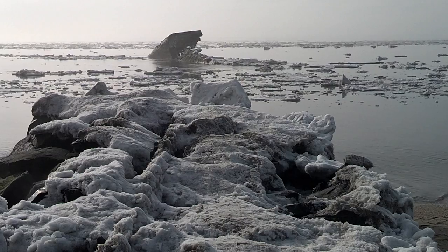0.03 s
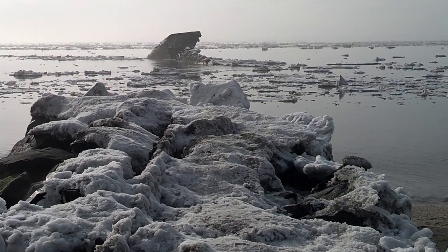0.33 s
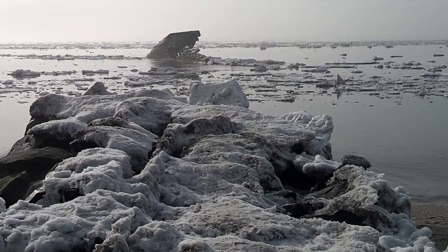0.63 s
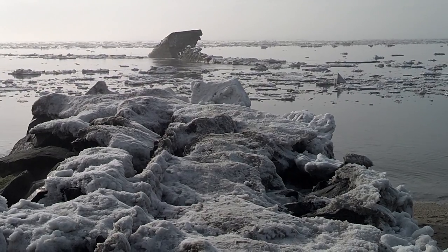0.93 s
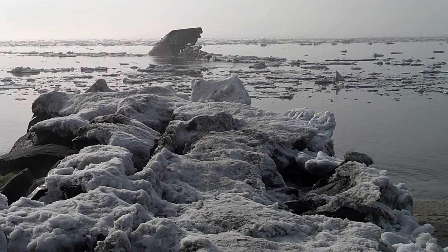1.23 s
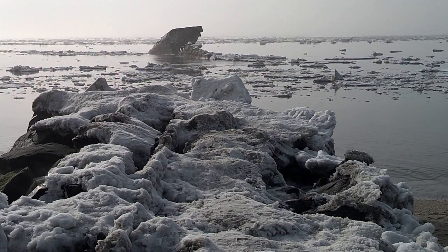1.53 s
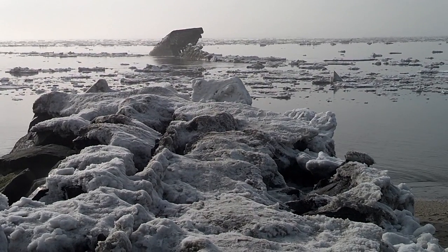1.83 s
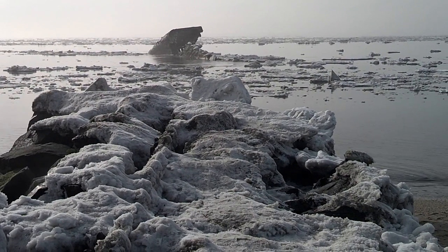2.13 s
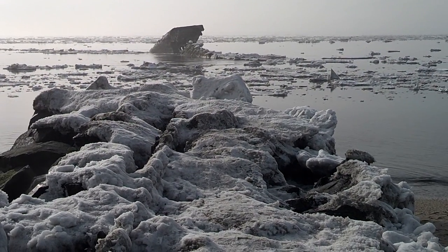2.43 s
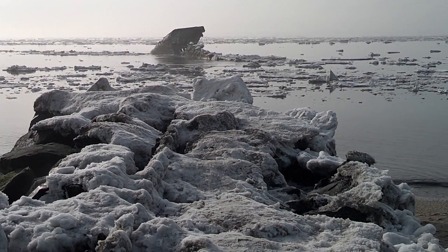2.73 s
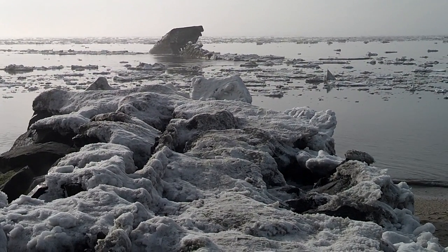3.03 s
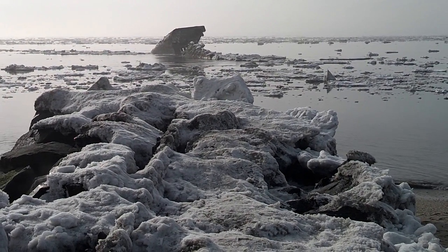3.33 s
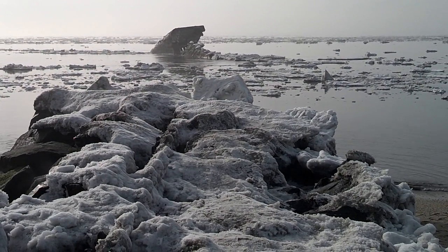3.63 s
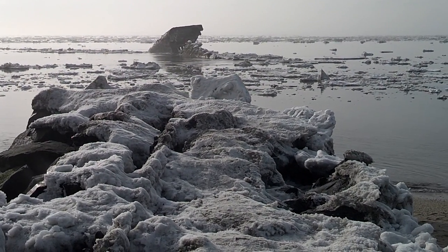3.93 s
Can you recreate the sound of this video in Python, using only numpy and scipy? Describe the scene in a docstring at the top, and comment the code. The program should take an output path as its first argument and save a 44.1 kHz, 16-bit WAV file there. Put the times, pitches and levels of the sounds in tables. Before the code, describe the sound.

Small waves wash and fizz on an icy shore while wind thumps the microphone.

```python
"""Small waves on an icy shore

One wave drains away, the water lies almost still, and the next rolls in. The wash fizzes with
small ringing bubbles; spurts of spray, hollow plops and two faint whistles stand out.
Wind rumbles and thumps on the ports of a small camera, which widens its stereo by delayed cross-feed."""
import sys
import numpy as np
from scipy import signal
from scipy.fft import rfft, irfft, next_fast_len
from scipy.io import wavfile
from scipy.ndimage import uniform_filter1d, map_coordinates

SR = 44100
rng = np.random.default_rng(int(sys.argv[2]) if len(sys.argv) > 2 else 0)


def store_pcm(level_fs):
    """Save levels as 16-bit WAV."""
    pcm = np.round(np.clip(level_fs, -1, 1) * 32767).astype(np.int16)
    wavfile.write(sys.argv[1], SR, np.atleast_2d(pcm).T)


N = 176400


def amp(db):
    """Decibels to gain."""
    return 10 ** (np.asarray(db) / 20)


def unit(x):
    """Scale to rms 1."""
    return x / np.sqrt(np.mean(x ** 2) + 1e-20)


def along(points, hz):
    """Interpolate (freq_hz, value) points on a log axis."""
    freqs_hz, values = np.transpose(points)
    return np.interp(np.log(hz + 1), np.log(freqs_hz + 1), values)


def curves(rows):
    """Per-sample curve for each column after time_s."""
    time_s, *columns = np.transpose(rows)
    return [np.interp(np.arange(N) / SR, time_s, column) for column in columns]


def wobble(knots_per_s):
    """Smooth random curve."""
    knots = rng.standard_normal(int(N * knots_per_s / SR) + 4)
    return map_coordinates(knots, [np.arange(N) * knots_per_s / SR])


def filtered(x, response):
    """Apply a complex frequency response."""
    size = next_fast_len(N + SR // 2)
    return irfft(rfft(x, size) * response(np.fft.rfftfreq(size, 1 / SR)), size)[..., :N]


def coloured(x, spectrum):
    """Apply a (freq_hz, gain_db) curve."""
    return filtered(x, lambda hz: amp(along(spectrum, hz)))


def noise(spectrum):
    """Coloured noise, rms 1, unrelated at the two ports."""
    return unit(coloured(rng.standard_normal((2, N)), spectrum))


def swell(start_s, level_db, rise_s, t60_s):
    """Envelope: linear rise, hold for 0.6 rise times, exponential decay."""
    age_s = np.arange(N) / SR - start_s
    decay_s = np.maximum(age_s - 1.6 * rise_s, 0)
    return amp(level_db - 60 * decay_s / t60_s) * np.clip(age_s / rise_s, 0, 1)


# Difference between the ports: freq_hz, side_over_mid_db
WATER_WIDTH = [(130, -8), (300, -11), (600, -2), (900, -3.5), (1400, 15), (2000, -3.5), (3300, -1.5),
               (12000, 1.5)]
LEFT_LEAN = 0.66  # mid-side correlation


def water_noise(spectrum, patchy_db):
    """Rush of water lying to the left, rms 1, patchy in time and frequency."""
    cells = signal.stft(rng.standard_normal((2, N)), nperseg=512)[2]
    patches = uniform_filter1d(rng.standard_normal(cells.shape[1:]), size=6, axis=0)
    patches = uniform_filter1d(patches, size=8, axis=1)
    mid, diffuse = signal.istft(cells * amp(patchy_db * unit(patches)), nperseg=512)[1][:, :N]
    side = coloured(LEFT_LEAN * mid + np.sqrt(1 - LEFT_LEAN ** 2) * diffuse, WATER_WIDTH)
    return unit(coloured(np.array([mid + side, mid - side]), spectrum))


BUBBLES_PER_S, BUBBLE_HZ, BUBBLE_LOG_SPREAD, BUBBLE_CYCLES, BUBBLE_SCATTER_DB = 800, 2154, 0.527, 7.6, 5.5


def bubbles():
    """Tiny bubbles, each a short ring rising in pitch; rms 1."""
    count = int(BUBBLES_PER_S * N / SR)
    when, right_gain, strength, u, v = rng.random((count, 5)).T
    gaussian = np.sqrt(-2 * np.log(1 - u)) * np.cos(2 * np.pi * v)
    pitch_hz = np.clip(BUBBLE_HZ * np.exp(BUBBLE_LOG_SPREAD * gaussian), 400, 12000)
    offsets = np.arange(SR // 40)
    age = pitch_hz[:, None] * offsets / SR / BUBBLE_CYCLES
    chirp = 1 + 0.15 * np.minimum(age, 2)
    rings = np.sin(2 * np.pi * BUBBLE_CYCLES * age * chirp) * np.exp(-2 * age)
    rings *= amp(BUBBLE_SCATTER_DB * np.minimum(-np.log(1 - strength), 5))[:, None]
    at = ((when * N).astype(int)[:, None] + offsets).ravel()
    ports = (rings, rings * right_gain[:, None])
    return unit(np.array([np.bincount(at, port.ravel(), N)[:N] for port in ports]))


# Ebb and return, before trims: time_s, wash_db, froth_db, foam_db
WAVE_LEVELS = [(0.0, -42, -42, -46), (0.21, -43, -44, -46.5), (0.47, -44, -47.5, -48),
               (0.91, -43.5, -45, -47), (1.08, -44, -46, -49.5), (1.35, -48, -52, -54),
               (1.71, -48, -59, -53), (1.85, -49, -60.5, -53), (1.98, -51, -60, -59),
               (2.09, -55, -63, -61.5), (2.51, -54, -61.5, -59.5), (2.65, -55.5, -64.5, -61.5),
               (2.88, -55, -62.5, -64.5), (3.11, -54.5, -64.5, -53.5), (3.21, -48.5, -57, -55.5),
               (3.35, -47, -52, -49), (3.48, -44.5, -52.5, -49), (3.84, -44, -46.5, -47.5),
               (4.0, -44, -44.5, -49.5)]
# Surf spectra: freq_hz, density_db
WASH_SPECTRUM = [(40, -24), (120, 2), (200, -1), (300, 3.5), (420, 0), (520, -3.5), (650, -2.5), (850, -5),
                 (1100, -8.5), (1400, -11.5), (2000, -14.5), (4500, -55)]
FROTH_SPECTRUM = [(700, -35), (1300, -45), (1650, -5), (2050, 3.5), (2500, 2.5), (3000, 5.5), (4000, -28),
                  (8000, -57)]
FOAM_SPECTRUM = [(1200, -33), (2400, 3.5), (3200, 1.5), (4300, 0.5), (5600, 0.5), (7200, -1.5), (9500, -6),
                 (12500, -15.5), (15500, -16)]
WASH_TRIM_DB, FROTH_TRIM_DB, FOAM_TRIM_DB, BUBBLE_TRIM_DB = 3, 1.5, 1.5, -15


def surf():
    """Water washes, froth seethes, foam hisses; the bubbles swell with the froth."""
    wash_db, froth_db, foam_db = curves(WAVE_LEVELS)
    wash = amp(wash_db + WASH_TRIM_DB + 0.47 * wobble(14)) * water_noise(WASH_SPECTRUM, 1.55)
    froth = amp(froth_db + FROTH_TRIM_DB + 0.84 * wobble(25.53)) * water_noise(FROTH_SPECTRUM, 3.0)
    foam = amp(foam_db + FOAM_TRIM_DB + 0.79 * wobble(25.2)) * water_noise(FOAM_SPECTRUM, 1.33)
    return wash + froth + foam + amp(froth_db + BUBBLE_TRIM_DB) * bubbles()


# Turbulence at the ports: time_s, level_db
BREEZE_LEVELS = [(0, -43), (.75, -42.5), (1.22, -46.5), (1.35, -52), (1.45, -40.5), (1.65, -52.5),
                 (2.0, -43.5), (2.25, -42.5), (2.65, -38), (2.72, -49), (2.95, -53), (3.2, -48.5),
                 (3.4, -45), (3.8, -45.5), (4, -47)]
# Its rumble: freq_hz, density_db
BREEZE_SPECTRUM = [(20, -35), (40, -14.5), (70, -9.5), (110, -1.5), (170, -12), (300, -21.5), (700, -39),
                   (3000, -70)]
FLUTTER_DB, FLUTTER_PER_S, WIND_LEFT_DB = 3.8, 24, -6


def breeze():
    """Continuous turbulence: a fluttering rumble, weaker on the left."""
    level_db, = curves(BREEZE_LEVELS)
    rumble = unit(amp(FLUTTER_DB * wobble(FLUTTER_PER_S)) * noise(BREEZE_SPECTRUM))
    return amp(level_db) * rumble * amp([[WIND_LEFT_DB], [0]])


# Eddies striking the ports, before trim: time_s, peak_db, sharpness_hz
EDDY_HITS = [(0.0595, -15, 350), (0.229, -16, 287), (0.262, -29.5, 97), (0.301, -30, 54), (0.331, -29, 43),
             (0.484, -32, 30), (0.656, -29.5, 43), (0.73, -28, 68), (0.752, -24.5, 96), (0.8153, -29, 30),
             (0.9734, -36.5, 77), (1.0736, -33, 138), (1.0981, -30.5, 109), (1.249, -26.5, 108),
             (1.476, -32, 97), (1.502, -31, 43), (1.6152, -30, 43), (1.6509, -32.5, 43), (1.678, -32, 61),
             (1.7285, -32, 38), (1.8382, -22.5, 51.7), (1.9456, -34.5, 47.7), (2.0785, -26.5, 63),
             (2.16, -29.5, 54), (2.196, -33, 48), (2.221, -33, 75.6), (2.3226, -31, 70.5),
             (2.375, -35, 155), (2.4286, -28, 144), (2.471, -27.5, 66.6), (2.543, -30, 60.4),
             (2.5898, -32.5, 54), (2.6121, -29, 68), (2.6436, -24.5, 134), (2.7358, -34.5, 43),
             (2.7831, -28.5, 250), (2.845, -32.5, 38), (3.0336, -28.5, 270), (3.397, -36, 86),
             (3.6977, -24, 74.6), (3.842, -23, 450), (3.8478, -21.5, 61), (3.8776, -21, 155),
             (3.898, -30, 174), (3.931, -25, 220), (3.9574, -14, 480)]
EDDY_TRIM_DB, EDDY_LEFT_GAIN, PORT_CUT_HZ = 3, 0.038, 109
CRACK_GAIN, CRACK_ROLLOFF_HZ, FULL_CRACK_SHARPNESS_HZ = 0.17, 1150, 450


def eddies():
    """Each eddy is one rounded pressure push through the ports' bass cut; the sharpest crack."""
    size, lead = 4096, 1024
    hz = np.fft.rfftfreq(size, 1 / SR)
    bass_cut = signal.freqs(*signal.butter(4, PORT_CUT_HZ, "high", analog=True), hz)[1]
    pushes = np.zeros(N + SR)
    for time_s, peak_db, sharpness_hz in EDDY_HITS:
        violence = min(sharpness_hz / FULL_CRACK_SHARPNESS_HZ, 1) ** 3
        crack = CRACK_GAIN * violence * np.exp(-hz / CRACK_ROLLOFF_HZ)
        thump = np.exp(-hz / sharpness_hz)
        push = np.roll(irfft(bass_cut * (thump + crack), size), lead)
        pushes[int(time_s * SR):][:size] -= amp(peak_db + EDDY_TRIM_DB) * push / np.abs(push).max()
    right = pushes[lead:lead + N]
    return np.array([EDDY_LEFT_GAIN * right, right])


# Spurts of spray: start_s, level_db, rise_s, t60_s, treble_db
SPRAY_SPURTS = [(.245, -46, 0.011, 0.26, -4), (.6185, -28.7, 0.005, 0.115, -0.5),
                (.791, -44.5, 0.0066, .08, -2), (1.245, -41.5, 0.019, 0.19, 4),
                (1.76, -52.5, 0.023, 0.19, -1), (2.2595, -40.5, 0.00099, 0.0076, 1),
                (2.355, -55.5, 0.016, 0.1, -5), (2.84, -59.5, .015, 0.14, -5),
                (2.99, -57.5, 0.0043, 0.055, -4), (3.696, -42.5, 0.0012, 0.021, -4)]
# Droplet hiss: freq_hz, density_db
SPRAY_SPECTRUM = [(500, -14), (1400, 5.5), (3200, 8), (5000, 5), (7200, 9), (10000, -2.5), (15500, -10)]
SPATTER_DB, SPATTER_PER_S = 2.2, 450


def spray():
    """Short spurts of spattering droplets, each with its own brightness."""
    out = np.zeros((2, N))
    hiss = water_noise(SPRAY_SPECTRUM, patchy_db=0.5) * unit(amp(SPATTER_DB * wobble(SPATTER_PER_S)))
    treble = filtered(hiss, lambda hz: along([(7000, 0), (12000, 1)], hz))
    for *envelope, treble_db in SPRAY_SPURTS:
        out += swell(*envelope) * (hiss + (amp(treble_db) - 1) * treble)
    return out


# Plops among the ice, before port gains: start_s, pitch_hz, level_db, t60_s
ICE_PLOPS = [(1.25, 166, -34, 0.083), (2.355, 204, -30.5, 0.08), (2.632, 280, -31, 0.092),
             (3.113, 850, -47, 0.055), (3.231, 317, -21.5, 0.016), (3.584, 352, -32.5, 0.052)]
PLOP_RISE_PER_S, PLOP_ATTACK_S = 3.4, 0.001


def plops():
    """Large trapped bubbles ring briefly and rise in pitch."""
    out = np.zeros(N)
    for start_s, pitch_hz, level_db, t60_s in ICE_PLOPS:
        age_s = np.clip(np.arange(N) / SR - start_s, 0, 0.5)
        envelope = amp(level_db - 60 * age_s / t60_s) * (1 - np.exp(-age_s / PLOP_ATTACK_S))
        cycles = pitch_hz * age_s * (1 + PLOP_RISE_PER_S * age_s / 2)
        out += envelope * np.sin(2 * np.pi * cycles)
    return np.array([1.75 * out, 0.9 * out])


# Whistles of the water: start_s, length_s, start_hz, end_hz, level_db
WHISTLE_GLIDES = [(2.34, .11, 590, 920, -50.5), (3.215, .21, 910, 730, -49.5)]
GURGLE_DEPTH, GURGLE_PER_S = 0.55, 180


def whistles():
    """Faint gurgling resonances on the left glide fast, then settle."""
    out = np.zeros(N)
    for start_s, length_s, start_hz, end_hz, level_db in WHISTLE_GLIDES:
        progress = np.clip((np.arange(N) / SR - start_s) / length_s, 0, 1)
        pitch_hz = end_hz + (start_hz - end_hz) * (1 - progress) ** 1.5
        tone = np.exp(2j * np.pi * np.cumsum(pitch_hz) / SR)
        gurgle = 1 + GURGLE_DEPTH * (wobble(GURGLE_PER_S) + 1j * wobble(GURGLE_PER_S))
        envelope = amp(level_db) * np.minimum(2 * np.sin(np.pi * progress), 1)
        out += envelope * (gurgle * tone).real
    return np.array([out, 0.18 * out])


# Gusts: start_s, level_db, rise_s, t60_s
GUST_SWELLS = [(3.84, -32, 0.033, 0.35), (3.923, -33, 0.017, 0.11)]
# Their tearing noise: freq_hz, density_db
GUST_SPECTRUM = [(40, -25), (130, 1.5), (400, -5), (900, -11), (2000, -11.5), (5000, -23.5), (14000, -43)]


def gusts():
    """Brief gusts tear at the ports, weaker on the left."""
    envelope = sum(swell(*gust) for gust in GUST_SWELLS)
    return envelope * noise(GUST_SPECTRUM) * amp([[WIND_LEFT_DB], [0]])


def scene():
    """Water and wind at the left and right ports."""
    water = surf() + spray() + plops() + whistles()
    wind = breeze() + eddies() + gusts()
    return water + wind


# Channel balance: freq_hz, right_over_left_db
BALANCE = [(100, 2), (400, 0), (900, -2), (2000, -0.5), (2770, 0), (4000, 2), (5540, 0), (7000, 2.3),
           (8300, 0)]
CROSS_FEED_GAIN, CROSS_DELAY_S, BAND_LIMIT_HZ = 0.93, 0.000361, 15750


def record(dry):
    """The camera subtracts a delayed copy of the opposite channel, then balances and band-limits."""
    opposite = filtered(dry[::-1], lambda hz: np.exp(-2j * np.pi * hz * CROSS_DELAY_S))
    wide = dry - CROSS_FEED_GAIN * opposite
    split = np.array([[-0.5], [0.5]])
    return filtered(wide, lambda hz: amp(along(BALANCE, hz) * split) * (hz < BAND_LIMIT_HZ))


dry = scene()
out = record(dry)
store_pcm(out)
```